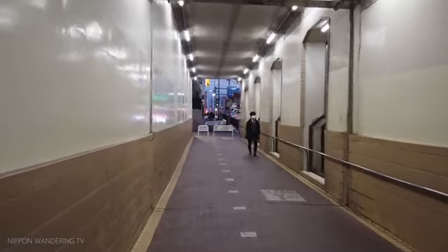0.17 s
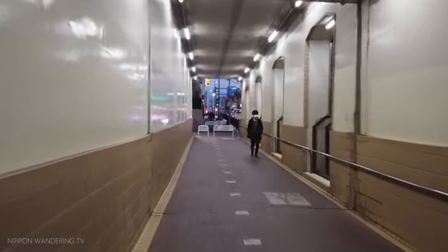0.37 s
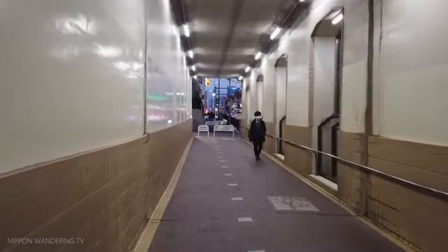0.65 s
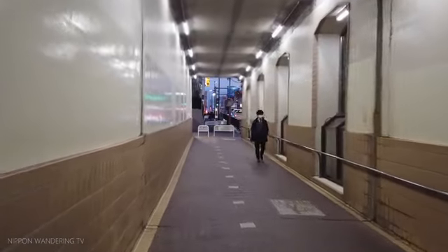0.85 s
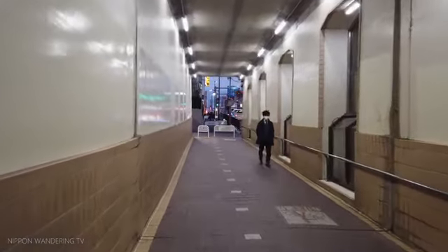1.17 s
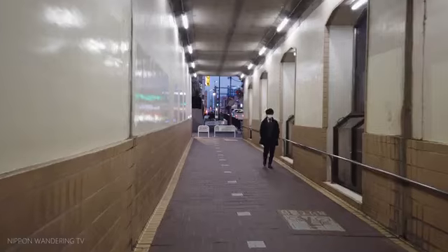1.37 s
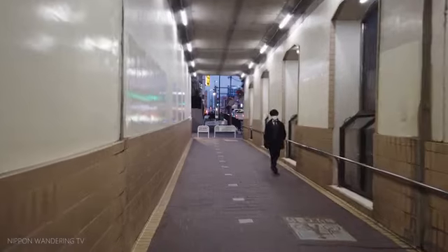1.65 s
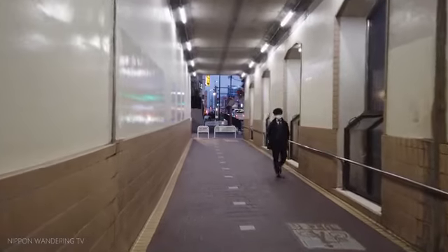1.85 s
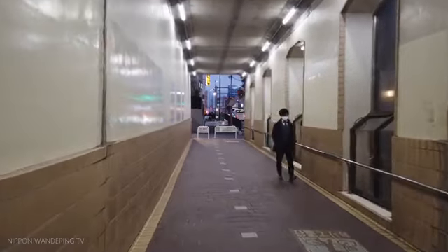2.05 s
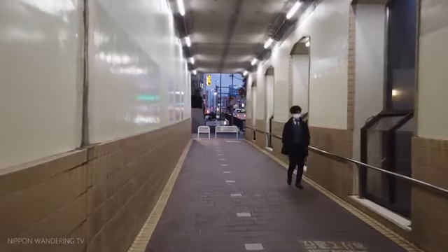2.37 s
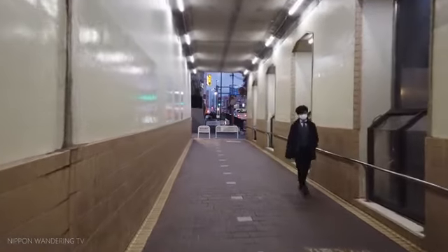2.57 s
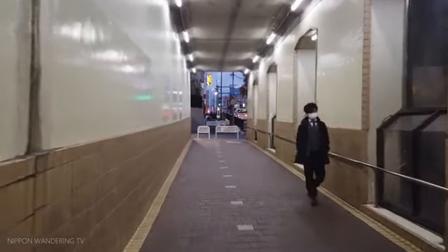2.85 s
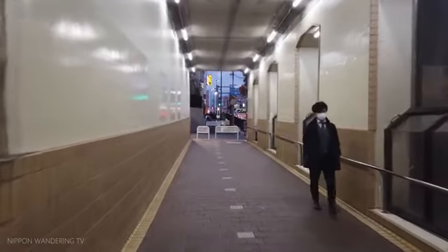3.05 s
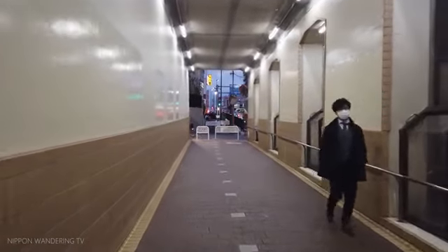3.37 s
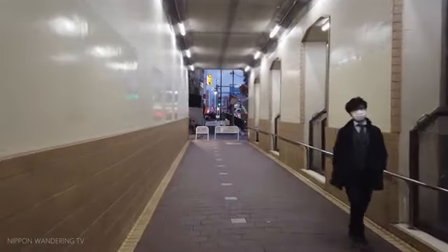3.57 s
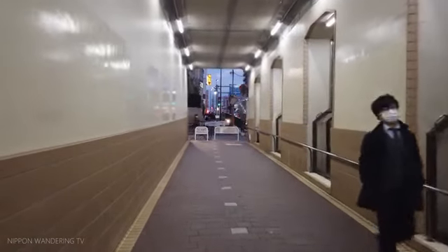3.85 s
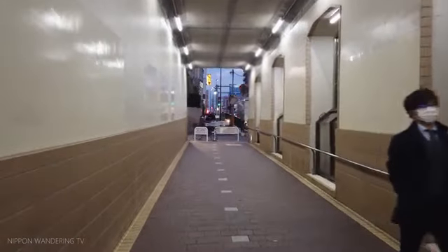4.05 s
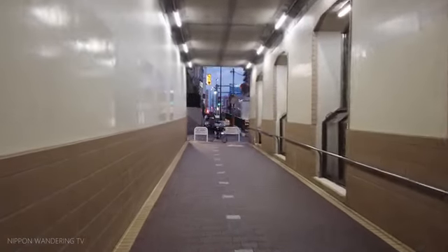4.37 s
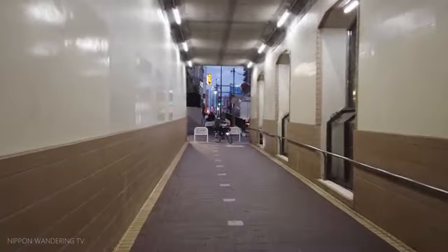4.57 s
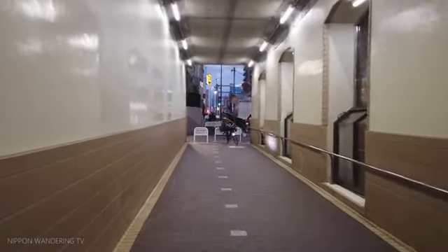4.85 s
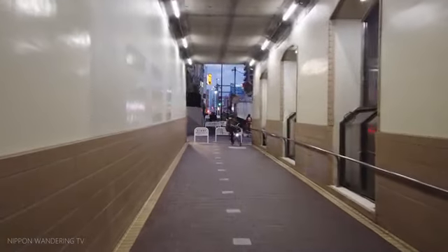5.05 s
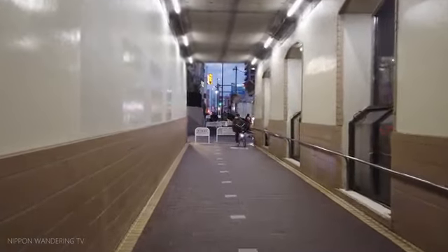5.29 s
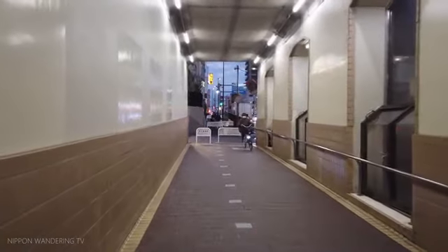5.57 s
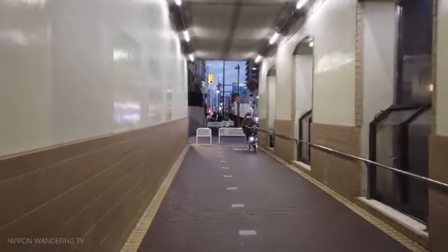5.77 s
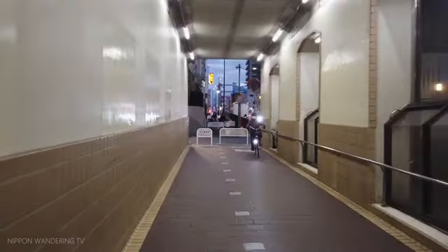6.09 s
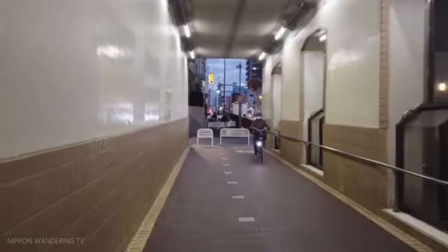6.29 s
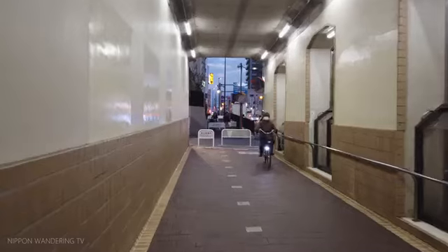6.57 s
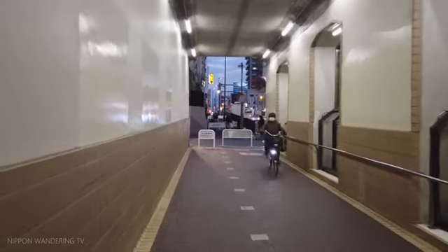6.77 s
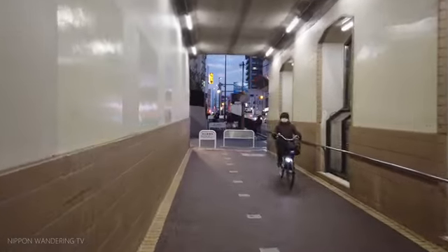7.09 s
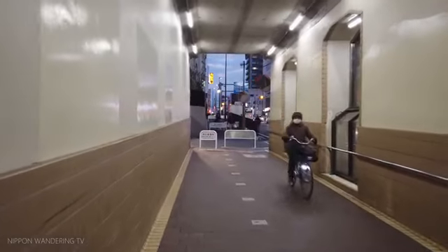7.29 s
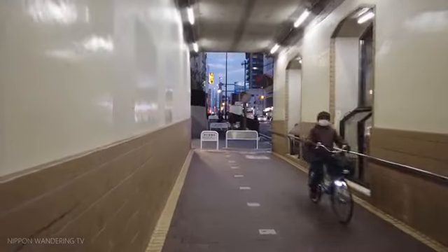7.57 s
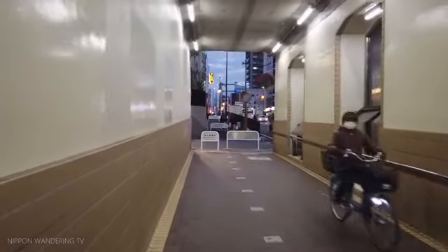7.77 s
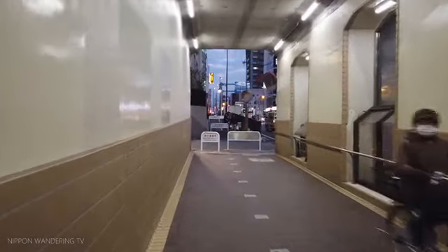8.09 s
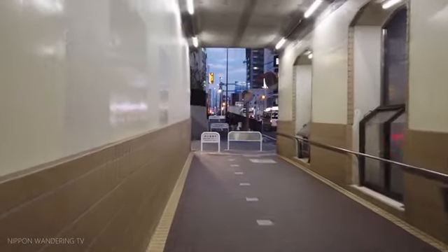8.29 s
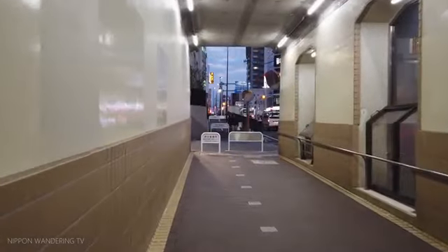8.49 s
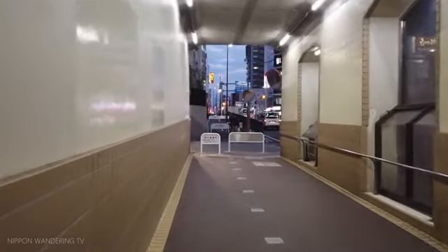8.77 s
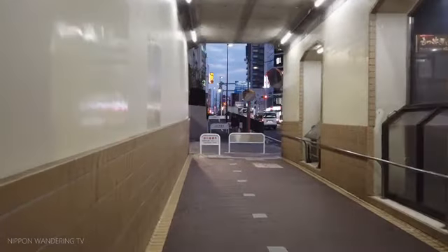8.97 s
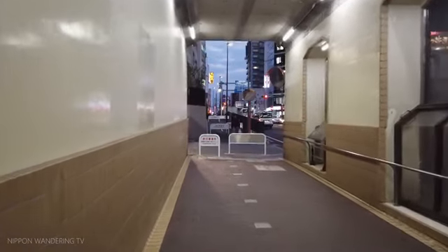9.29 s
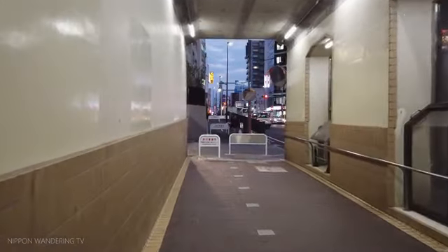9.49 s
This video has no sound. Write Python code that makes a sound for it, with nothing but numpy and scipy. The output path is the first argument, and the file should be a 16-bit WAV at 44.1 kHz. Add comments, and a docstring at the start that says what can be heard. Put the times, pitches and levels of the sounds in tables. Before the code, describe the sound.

A bicycle's brake squeals in high, echoing bursts, then its freewheel ticks past, over steady road traffic heard inside a pedestrian tunnel.

```python
"""In a tiled pedestrian underpass, road traffic drifts in as rumble, engine drone, tyre roar and hiss.
A bicycle rolls down the ramp. Its brake pad sticks and slips, squealing in bursts, and bumps make a
loose metal part tinkle. It passes on the right, its freewheel ticking as a small catch drops over
the teeth. The hard walls ring with every small sound."""
import sys
import numpy as np
from scipy import signal
from scipy.fft import rfft, irfft, next_fast_len
from scipy.io import wavfile

SR = 44100
rng = np.random.default_rng(int(sys.argv[2]) if len(sys.argv) > 2 else 0)


def transcribe(u):
    """Save the signal u as a 16-bit wav file named by the first command-line argument.

    u: samples, shape (n,) or (channels, n), limited to [-1, 1]; the rate is SR.
    q: integer samples, one column per channel.
    """
    v = np.clip(np.atleast_2d(u).T, -1, 1)
    q = np.round(v * 32767).astype(np.int16)
    wavfile.write(sys.argv[1], SR, q)


N = 424683
TIME = np.arange(N) / SR

# how loud the traffic and its deep rumble are: (time [s], relative level [dB])
TRAFFIC_LEVEL = [(0.1, -41), (0.2, -42), (0.99, -41.5), (1.96, -38), (2.74, -40.5), (3.42, -39.5),
                 (3.63, -40), (4.6, -41.5), (4.86, -43.5), (8.27, -44), (9.37, -44.5), (9.5, -44.5)]
RUMBLE_LOUDNESS = [(0, -31.5), (0.9, -32), (1.3, -32.5), (2.1, -32), (2.5, -29.5), (3.3, -31.5),
                   (4.1, -34.5), (4.6, -33.5), (5.6, -35.5), (7.45, -33.5), (8.0, -36), (8.7, -37.5),
                   (9.6, -31.5)]
# the tone colour of each layer of noise: (frequency [Hz], relative level [dB])
RUMBLE_COLOUR = [(14, 4.5), (20, 2.5), (25, -1), (33, -6.5), (42, -5.5), (52, -7), (68, -7.5), (80, -11),
                 (90, -17.5)]
DRONE_COLOUR = [(53, -11.5), (90, 0), (123, -0.5), (194, -4), (253, -2.5), (367, -7.5), (500, -13),
                (650, -43), (1100, -120)]
ROAR_COLOUR = [(290, -15), (500, 0), (618, -0.5), (1030, 0), (1280, -1.5), (1900, -10), (2470, -23),
               (4180, -120)]
TREAD_COLOUR = [(720, -9), (790, -3), (870, -14)]  # the howling tyre tread of one close vehicle
RUSH_COLOUR = [(1120, -23), (1900, -4), (3310, -9.5), (4200, -23), (5460, -57), (9240, -120)]
HISS_COLOUR = [(3700, -62), (4300, 0.5), (5500, 1), (6800, 0), (8000, -3), (10000, -11.5), (13000, -12.5)]
AIR_COLOUR = [(7000, -4), (9500, -4.5), (11000, -1), (12400, 0.5), (14000, -1.5), (15500, -6)]
# how wide the noise sounds: (frequency [Hz], side minus middle [dB])
STEREO_WIDTH = [(25, -18.5), (70, -15.5), (160, -9), (330, -4), (650, 1.5), (1400, 0), (12000, 1)]
# swells of drone (heavier vehicles) and of hiss: (time [s], half length [s], level [dB])
HEAVY_VEHICLES = [(.6, 0.15, -45), (2.1, 0.24, -38.5), (7.0, 0.42, -42.5), (9.35, 0.36, -46)]
SOFT_SWELLS = [(3.55, 0.18, -73), (4.72, .09, -70), (5.12, 0.2, -65), (6.02, 0.22, -66), (6.6, 0.45, -69.5),
               (8.7, 0.3, -70.5), (9.45, 0.18, -76)]
# engines that stand out: (peak time [s], rise [s], fall [s], pitch [Hz], glide [octaves/s], level [dB])
ENGINE_NOTES = [(0.3, 0.24, 0.83, 46.8, -0.078, -32), (1.27, 0.18, .2, 21, -0.013, -23.5),
                (1.8, .3, 0.37, 15, 0, -27), (1.85, 0.32, 0.42, 32, 0, -33.5),
                (1.85, 0.2, 0.2, 103, -0.0045, -42), (1.6, 0.23, 0.22, 112, 0, -44),
                (2.0, 0.55, 0.15, 129.8, 0, -38.5), (2.34, 0.29, 0.5, 256.5, 0, -39),
                (2.76, .3, 0.3, 42.8, -.05, -40), (3.65, 0.64, 0.41, 26, 0, -29.5),
                (4.0, 0.4, 0.6, 252, -.04, -48), (3.8, 0.44, 0.45, 59.8, .02, -35.5),
                (5.2, .25, .2, 56, 0, -45), (4.54, 0.33, 0.84, 40.6, -.03, -34),
                (6.1, 0.36, 0.42, 43, -0.073, -36), (7.08, 0.42, 0.19, 58.6, -.03, -32),
                (7.08, 0.34, .2, 117.3, 0.033, -49), (7.25, 0.16, 0.14, 230.9, -.02, -43),
                (6.85, 0.55, 0.38, 409, .015, -50.5), (6.65, 0.5, .3, 310, -0.032, -51),
                (8.1, 0.33, 0.22, 118.8, 0, -42.5), (8.85, 0.2, 0.19, 44, -0.14, -37),
                (8.7, 0.18, .3, 34, -.3, -26)]
# the tone colour of small steel parts touching: (frequency [Hz], relative level [dB])
STEEL_COLOUR = [(3500, -10), (6800, -2), (9800, -6), (12500, -3), (15500, -3)]
# bumps that shake the loose part: (time [s], relative level [dB], left minus right [dB])
BUMPS = [(4.4391, -71, 1.0), (4.6792, -66, 2.0), (4.7142, -67, 3.0), (4.997, -57, -1.5), (5.0494, -65, 0.5),
         (5.19, -68, 0), (5.44, -63, 2.5), (5.615, -69, -2), (5.715, -66, 0.0), (6.0586, -58, 6.0),
         (6.1414, -58, -1.0), (6.6184, -63, 6.5), (7.5867, -63, 3.5), (7.877, -58, 4), (8.0092, -56, -2.0),
         (8.177, -51, -5), (8.1994, -62, 0.0)]
# the notes that part rings with: (pitch [Hz], relative level [dB], time to fade by 60 dB [s])
METAL_NOTES = [(10800, -6, 0.07), (12200, -9, 0.06), (14270, 0, .12), (14480, 1, .06)]
# small ticks nearby: (time [s], relative level [dB], left minus right [dB])
CLOSE_TICKS = [(.901, -41, 7), (.9143, -38.5, 4), (3.975, -47, 0), (4.43, -49, 0), (8.038, -42, 3),
               (8.178, -49, -5), (8.187, -49, 5), (9.005, -48, -8), (9.042, -53, -8), (9.077, -48, -10),
               (9.143, -48, -10), (9.208, -48, -8), (9.586, -50, -5)]
# brief squeaks: (peak time [s], rise [s], fall [s], pitch [Hz], level [dB])
SHORT_SQUEAKS = [(2.325, 0.012, .012, 8680, -61), (4.186, 0.019, .009, 3235, -40),
                 (6.38, 0.043, .03, 3260, -59.5)]
# squeals that slide with pad pressure, one list per squeeze: (time [s], pitch [Hz], level [dB])
SLIDING_SQUEALS = [
    [(2.77, 8080, -58), (2.86, 7940, -53), (2.9, 8100, -48), (2.935, 7900, -62), (3.02, 7880, -56),
     (3.062, 8120, -62), (3.125, 8100, -46), (3.2, 8300, -75)],
    [(3.58, 8028, -66), (3.6, 8150, -55), (3.666, 8050, -49), (3.83, 8170, -50), (3.9, 8340, -60),
     (3.96, 8470, -56.5), (4.1, 8200, -54), (4.15, 8400, -69)],
    [(4.31, 8160, -60), (4.345, 8300, -47), (4.385, 8500, -46), (4.47, 8540, -52), (4.54, 8060, -47),
     (4.7, 8350, -49.5), (4.77, 8500, -57), (4.83, 8370, -54), (4.92, 8480, -56), (5.02, 8500, -64)],
    [(5.38, 8500, -54), (5.415, 8400, -52), (5.442, 8300, -46), (5.5, 8460, -72), (5.7, 8200, -76),
     (5.754, 8520, -51), (5.86, 8550, -64), (6.0, 8480, -74)],
    [(7.46, 8300, -59), (7.532, 8160, -59), (7.638, 7730, -66), (7.7, 7730, -76), (7.83, 7850, -68)],
]
# squeals that hold one pitch: (start [s], end [s], starting level [dB])
STEADY_SQUEALS = [(3.95, 4.1, -84), (4.316, 4.49, -52), (4.496, 4.68, -66), (4.722, 4.99, -54),
                  (5.222, 5.965, -50.5), (6.242, 7.152, -52), (7.418, 7.494, -53.5)]

PASS_S = 8.36  # the bicycle is closest


def undb(db):
    """Turn decibels into a gain, the number a sound is multiplied by."""
    return 10 ** (np.asarray(db) / 20)


def curves(table):
    """Join the points of each table column with straight lines in time."""
    s, *columns = np.transpose(table)
    return [np.interp(TIME, s, c) for c in columns]


def gate(start, end, fade):
    """A gain that is on from start to end, with soft edges."""
    return np.clip(np.minimum(TIME - start, end - TIME) / fade + .5, 0, 1)


def swell(s, rise_s, fall_s):
    """A bell-shaped gain that peaks at time s; an endless fall keeps it up."""
    return np.exp(-.5 * ((TIME - s) / np.where(TIME < s, rise_s, fall_s)) ** 2)


def together(*gains):
    """The gain of unrelated noises sounding at once: their powers add."""
    return np.sqrt(sum(g ** 2 for g in gains))


def swells(table):
    """One gain for a whole table of swells."""
    return together(*(undb(db) * swell(s, half_s, half_s) for s, half_s, db in table))


def glide(s, hz, octaves_per_s):
    """A pitch that slides through hz, from a second before time s to a second after."""
    return hz * 2 ** (octaves_per_s * np.clip(TIME - s, -1, 1))


def wobble(rate):
    """A random wobble about 1 in size that takes a new turn rate times a second."""
    points = rng.standard_normal(8192)
    return 1.196 * np.interp(TIME * rate, np.arange(len(points)), points)


def pan(db):
    """Gains for the two ears; a positive number moves the sound left."""
    return undb(np.array([[db], [-db]]) / 2)


def add(out, s, sound):
    """Mix a short sound in at time s."""
    start = int(s * SR)
    out[:, start:start + sound.shape[-1]] += sound[:, :max(N - start, 0)]


def colour(x, spectrum):
    """Give a sound a tone colour; beyond the table's ends it drops 60 dB per octave."""
    size = next_fast_len(N, True)
    octave = np.log2(np.maximum(np.fft.rfftfreq(size, 1 / SR), 1))
    hz, db = np.transpose(spectrum)
    outside = np.abs(octave - np.clip(octave, np.log2(hz[0]), np.log2(hz[-1])))
    gain = undb(np.interp(octave, np.log2(hz), db) - 60 * outside)
    return irfft(rfft(x, size) * gain, size)[..., :N]


def wide_noise(spectrum, flutter_db, flutter_rate):
    """Restless noise from all round: long waves reach both ears alike, short ones do not."""
    width = [(1, STEREO_WIDTH[0][1])] + STEREO_WIDTH + [(SR / 2, 0)]
    middle = colour(rng.standard_normal(N), spectrum)
    side = colour(colour(rng.standard_normal(N), spectrum), width)
    ears = (middle + side * np.array([[1], [-1]])) / np.std(middle)
    return ears * undb(flutter_db * wobble(flutter_rate))


def tone(hz, db, jitter, rate, rough_db):
    """A vibration that wavers in pitch (by the fraction jitter) and in level (by rough_db)."""
    phase = 2 * np.pi * np.cumsum(hz * (1 + jitter * wobble(rate))) / SR
    return np.sqrt(2) * np.sin(phase) * undb(db + rough_db * wobble(rate / 2))


def click(ring_s):
    """A tiny hard knock: a burst of noise that dies quickly."""
    t = TIME[:SR // 30]
    return rng.standard_normal(len(t)) * np.exp(-t / ring_s)


def underpass(x, echo_s, echo_db, build_s=0.0011):
    """The tiled walls add a wash of echoes that fades by 60 dB in echo_s seconds."""
    t = TIME[:SR]
    tail = rng.standard_normal((2, SR)) * undb(-60 * t / echo_s) * (1 - np.exp(-t / build_s))
    tail /= np.sqrt(np.sum(tail ** 2, axis=1, keepdims=True))
    echoes = signal.fftconvolve(np.broadcast_to(x, (2, N)), tail, axes=1)[:, :N]
    return (x + undb(echo_db) * echoes) / np.sqrt(1 + undb(2 * echo_db))  # keep the same power


def traffic_flow(db, follow, usual_db=-42):
    """A layer's gain: db in usual traffic, plus a share (follow) of the traffic's ups and downs."""
    return undb(db + follow * (curves(TRAFFIC_LEVEL)[0] - usual_db))


def close_vehicle(db, peak_s=1.59, fall_db_per_s=7):
    """The gain of one close vehicle: it lines up with the entrance quickly and leaves slowly."""
    leaving = undb(db - fall_db_per_s * np.maximum(TIME - peak_s, 0))
    return swell(peak_s, rise_s=0.24, fall_s=np.inf) * leaving


def traffic():
    """Many vehicles blurred by the passage: rumble, drone, and tyres that sound brighter when near."""
    rumble_gain = undb(curves(RUMBLE_LOUDNESS)[0] + 1.2)
    drone_gain = together(traffic_flow(-37.5, follow=0.59), swells(HEAVY_VEHICLES))
    rush_gain = together(traffic_flow(-55, follow=0.82), close_vehicle(-48), swells(SOFT_SWELLS) * undb(9))
    tread_gain = undb(-48) * swell(2.08, rise_s=0.67, fall_s=0.67)
    rumble = wide_noise(RUMBLE_COLOUR, flutter_db=-0.5, flutter_rate=6.1) * rumble_gain
    drone = wide_noise(DRONE_COLOUR, flutter_db=0.85, flutter_rate=7) * drone_gain
    roar = wide_noise(ROAR_COLOUR, flutter_db=0.5, flutter_rate=9) * traffic_flow(-41.5, follow=0.96)
    rush = wide_noise(RUSH_COLOUR, flutter_db=0.5, flutter_rate=9) * rush_gain
    tread = wide_noise(TREAD_COLOUR, flutter_db=1.5, flutter_rate=8.5) * tread_gain
    return rumble + drone + roar + rush + tread


def hiss():
    """A thin hiss above the traffic; it swells with the close vehicle and with the bicycle's whirr."""
    whirr = undb(-67.5) * swell(PASS_S, rise_s=0.36, fall_s=np.inf)
    soft = swells(SOFT_SWELLS)
    low_gain = together(traffic_flow(-70, follow=.05), close_vehicle(-61), soft)
    air_gain = together(traffic_flow(-73.5, follow=.05), close_vehicle(-69), soft * undb(-6), whirr)
    low = wide_noise(HISS_COLOUR, flutter_db=.4, flutter_rate=18) * low_gain
    air = wide_noise(AIR_COLOUR, flutter_db=.4, flutter_rate=40) * air_gain
    return low + air


def engines():
    """Engine notes out on the road swell, glide and fade, wavering and echoing as they drift in."""
    notes = np.zeros(N)
    for s, rise_s, fall_s, hz, slope, db in ENGINE_NOTES:
        note = tone(glide(s, hz, slope), db, jitter=0.00403, rate=16, rough_db=0.24)
        notes += note * swell(s, rise_s, fall_s)
    return underpass(notes, echo_s=0.99, echo_db=-17)


def tinkles():
    """Bumps rattle a loose metal part; from far off, its echoes come later and last longer."""
    rings, scrapes = np.zeros((2, N)), np.zeros((2, N))
    t = TIME[:SR // 4]
    hz, note_db, fade_s = np.transpose(METAL_NOTES)[:, :, None]
    build = 1 - np.exp(-t / .009)  # several light touches build up the ring
    chances = rng.standard_normal((len(BUMPS), 2, len(METAL_NOTES), 1))
    for (s, db, pan_db), (detune, strength) in zip(BUMPS, chances):
        notes = np.sin(2 * np.pi * hz * (1 + .004 * detune) * t)
        notes *= undb(note_db + 1.5 * strength - 60 * t / fade_s)
        gain = undb(db) * pan(pan_db)
        add(rings, s, notes.sum(axis=0) * build * gain)
        add(scrapes, s, click(ring_s=0.011) * gain)
    rattle = rings * undb(10) + colour(scrapes, STEEL_COLOUR) * undb(5)
    nearness = np.exp(-np.abs(TIME - PASS_S) / .8)
    far = underpass(rattle * (1 - nearness), echo_s=0.37, echo_db=1, build_s=.015)
    return far + underpass(rattle * nearness, echo_s=0.11, echo_db=5)


def freewheel():
    """A small catch drops over each tooth as the bicycle coasts; a few close ticks stand out."""
    catch, close = np.zeros((2, N)), np.zeros((2, N))
    for s, db, pan_db in CLOSE_TICKS:
        add(close, s, click(ring_s=0.0009) * undb(db) * pan(pan_db))
    start_s, clear_s, teeth_per_s = 7.9, 8.26, 29
    teeth = np.arange(start_s, N / SR, 1 / teeth_per_s)
    for s, (late, strength) in zip(teeth, rng.standard_normal((len(teeth), 2))):
        # the ticking grows fast as it comes out from behind the rider, then slowly
        db = -44 + min(24 * (s - clear_s), 1.5 * (s - clear_s))
        add(catch, s + 0.0021 * late, click(ring_s=0.0042) * undb(db + 1.2 * strength) * pan(-3))
    ticks = underpass(catch, echo_s=.4, echo_db=7.5) + underpass(close, echo_s=0.28, echo_db=-3)
    return colour(ticks, STEEL_COLOUR)


def squeaks():
    """Brief rough squeaks on the left droop in pitch and ring on along the passage."""
    chirps = np.zeros(N)
    for s, rise_s, fall_s, hz, db in SHORT_SQUEAKS:
        chirp = tone(glide(s, hz, octaves_per_s=-1.4), db, jitter=.018, rate=380, rough_db=2)
        chirps += chirp * swell(s, rise_s, fall_s)
    return underpass(chirps * pan(5.4), echo_s=1.3, echo_db=-1.5)


def brake():
    """The pad sticks and slips: one squeal slides with pressure, another holds its ringing pitch."""
    sliding, grip = np.zeros(N), np.zeros(N)
    for squeeze in SLIDING_SQUEALS:
        squeal = tone(*curves(squeeze), jitter=.0055, rate=340, rough_db=2)
        sliding += squeal * gate(squeeze[0][0], squeeze[-1][0], fade=0.036)
    sag_db_per_s = 10  # each squeeze weakens as the wheel slows
    for start, end, db in STEADY_SQUEALS:
        grip += gate(start, end, fade=0.091) * undb(db - sag_db_per_s * np.maximum(TIME - start, 0))
    steady = tone(hz=8895, db=0, jitter=0.0034, rate=150, rough_db=0.5) * grip
    chatter = undb(2.1 * wobble(rate=35))  # the pad grips unevenly
    return underpass((sliding + steady) * chatter, echo_s=0.46, echo_db=7.5)


def scene():
    """Everything heard from the middle of the passage."""
    return traffic() + hiss() + engines() + brake() + squeaks() + tinkles() + freewheel()


def record(dry):
    """Cut away the highest treble, above 15000 Hz."""
    return signal.sosfilt(signal.ellip(10, .2, 80, 15000, fs=SR, output="sos"), dry)


dry = scene()
out = record(dry)
transcribe(out)
```